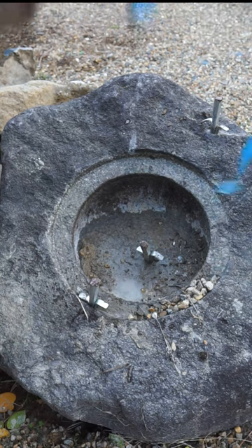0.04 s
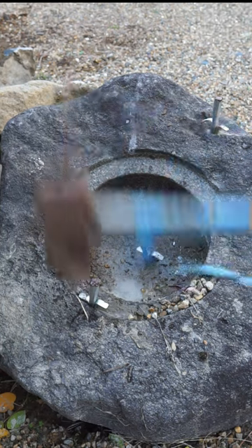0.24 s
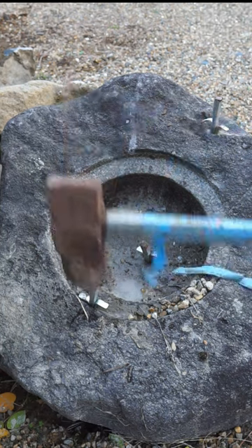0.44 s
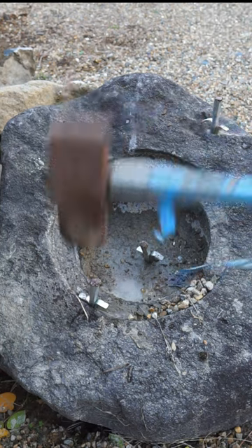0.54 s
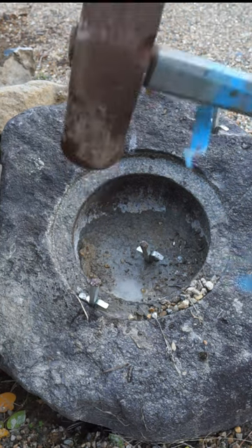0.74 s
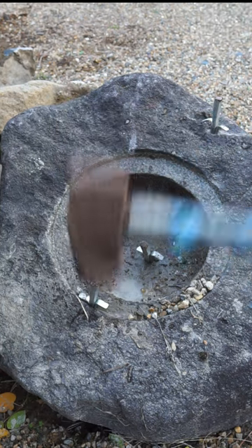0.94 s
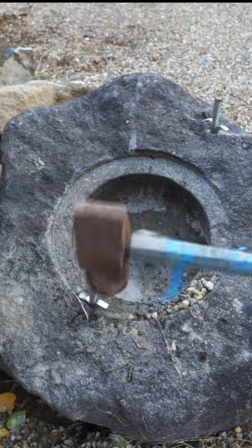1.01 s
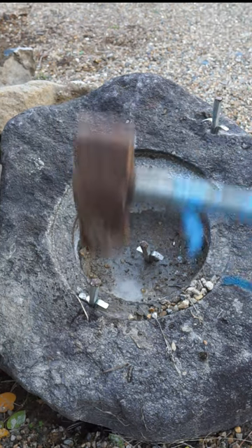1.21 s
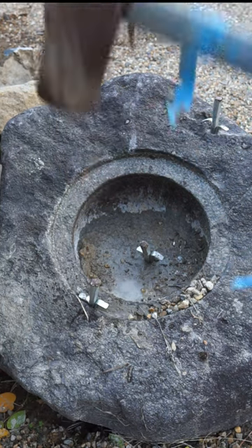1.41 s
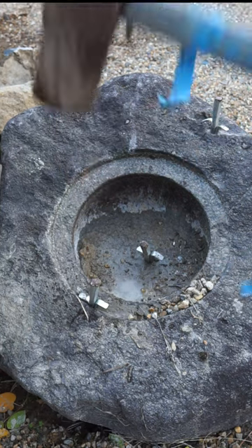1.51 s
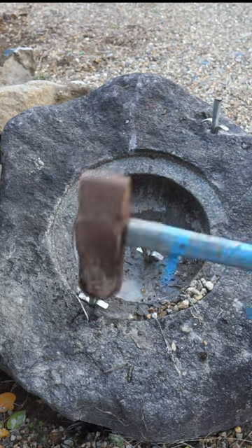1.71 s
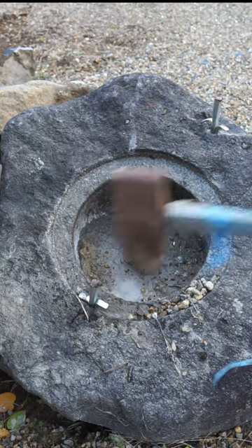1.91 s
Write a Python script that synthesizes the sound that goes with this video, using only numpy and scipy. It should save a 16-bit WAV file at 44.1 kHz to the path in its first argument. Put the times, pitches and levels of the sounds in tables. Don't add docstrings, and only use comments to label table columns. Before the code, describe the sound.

Heavy hammer blows on steel in rock, heard close up outside on gravel. Loose shims tinkle and stones rustle first, then three bright metallic cracks ring and fade, with faint grit and pebble knocks between them.

```python
import sys
import numpy as np
from scipy import signal
from scipy.fft import rfft, irfft, next_fast_len
from scipy.io import wavfile

SR = 44100
rng = np.random.default_rng(int(sys.argv[2]) if len(sys.argv) > 2 else 0)


def to_linear_factor(level_db):
    exponent = np.asarray(level_db, float) / 20
    return 10 ** exponent


def to_wav(sig):
    pcm = np.clip(np.atleast_2d(sig), -1, 1) * 32767
    pcm = np.round(pcm).astype(np.int16)
    wavfile.write(sys.argv[1], SR, pcm.T)


N = 85995
OPPOSED = np.array([[1], [-1]])


def rms_one(x):
    return x / np.sqrt(np.mean(x ** 2) + 1e-20)


def at_hz(points, hz):
    table_hz, value = np.transpose(points)
    return np.interp(np.log(hz), np.log(table_hz), value)


def drift(rate_hz):
    r = np.exp(-2 * np.pi * rate_hz / SR)
    settle = 20000
    wander = signal.lfilter([1], [1, -2 * r, r * r], rng.standard_normal(N + settle))
    return rms_one(wander[settle:])


def ring(push, hz, t60_s):
    r = to_linear_factor(-60 / (max(t60_s, .001) * SR))
    w = 2 * np.pi * hz / SR
    return signal.lfilter([0, np.sin(w)], [1, -2 * r * np.cos(w), r * r], push + 1e-18)


def add(out, start_s, x):
    i = int(start_s * SR)
    out[..., i:i + x.shape[-1]] += x[..., :N - i]


def filtered(x, order, hz, kind):
    return signal.sosfilt(signal.butter(order, hz, kind, fs=SR, output="sos"), x)


def wash(spectrum, gain):
    # frequency in Hz, likeness 0 to 1.
    likeness = [(60, 0.86), (300, 1), (1000, 0.5), (3000, 0.08), (10000, 0.14)]
    out = 0
    edges_hz = 28 * 2 ** np.arange(0, 9.6, .5)
    white = rng.standard_normal((2, 2, N))
    for k, (low_hz, high_hz) in enumerate(zip(edges_hz, edges_hz[1:])):
        mid, side = filtered(white[k % 2], 2, [low_hz, high_hz], "band")
        hz = np.sqrt(low_hz * high_hz)
        alike = np.clip(at_hz(likeness, hz), 0, 1)
        stereo = np.sqrt(1 + alike) * mid + np.sqrt(1 - alike) * side * OPPOSED
        out = out + to_linear_factor(at_hz(spectrum, hz)) * gain(hz) * stereo
    return out


def air():
    # frequency in Hz, level in dB.
    air_colour = [(18, -67), (30, -39.5), (200, -17.5), (519, -12.5), (1800, -4.5), (2600, 0), (3380, -3.5),
                  (13400, -5.5), (15200, -14), (16500, -22.5)]
    return to_linear_factor(-70) * rms_one(wash(air_colour, lambda hz: 1))


def rustle():
    # time in seconds, level in dB.
    rustle_course = [(0, -48), (0.038, -55.5), (.12, -51.5), (.2, -51.5), (.225, -55.5), (.45, -75.5),
                     (0.602, -89.5), (1.002, -67.5), (1.099, -64), (1.24, -60.5), (1.328, -68),
                     (1.499, -75), (1.558, -88), (1.7, -68.5), (1.8, -59), (1.95, -64)]
    # frequency in Hz, level in dB.
    rustle_colour = [(300, -30.5), (620, -14), (950, 0.5), (1600, -11.5), (2300, -3), (4500, -12.5),
                     (8000, -21), (15000, -25.5)]
    course = to_linear_factor(np.interp(np.arange(N) / SR, *np.transpose(rustle_course)))
    shared = drift(30)
    own = [drift(24) for _ in range(3)]
    patches = wash(rustle_colour, lambda hz: to_linear_factor(0.75 * shared + 2.0 * own[int(hz) % 3]))
    return course * to_linear_factor(3.0) * rms_one(patches)


def taps():
    # start in seconds, peak in dB, frequency in
    # Hz, t60 in seconds.
    knocks = [(.002, -37.5, 1160, 0.033), (0.1245, -36.5, 2420, 0.0028), (0.127, -38.5, 1380, 0.021),
              (0.2086, -30, 1295, 0.012), (0.2099, -37.5, 2080, 0.011), (0.2958, -31.5, 6500, 0.014),
              (0.3128, -32.5, 7160, 0.055), (.338, -31, 6700, 0.032), (.345, -49, 2690, .03),
              (.46, -50, 2700, 0.041), (0.516, -58, 2530, 0.048), (0.658, -54, 2700, 0.051),
              (.71, -53.5, 2730, 0.044), (0.7933, -52.5, 2690, 0.029), (0.9266, -51.5, 2710, 0.049),
              (1.4501, -46, 2417, 0.026), (1.621, -44.5, 2420, 0.03), (1.6262, -40, 2430, 0.045),
              (1.6295, -40.5, 2395, 0.012), (1.8261, -45.5, 2380, 0.032), (.964, -48.5, 2600, 0.015),
              (1.012, -47, 6000, 0.046), (1.721, -40, 7740, 0.029), (1.0113, -31, 7825, 0.089)]
    # start in seconds, peak in dB, frequency in Hz, t60 in seconds.
    undertones = [(0.7928, -63, 1286, 0.11), (0.929, -64, 1258, 0.2), (1.451, -62, 498, 0.072),
                  (1.627, -43.5, 1221, 0.069), (1.628, -50, 490, 0.048), (1.828, -42, 1070, 0.04)]
    out = np.zeros(N)
    t = np.arange(SR // 5) / SR
    for start_s, db, hz, t60_s in knocks + undertones:
        touch = np.exp(-t / 0.00021)
        scrape = rng.standard_normal(len(t)) * np.exp(-t / 0.0068)
        mode = ring(touch * np.cos(2 * np.pi * hz * t) + 0.18 * scrape, hz, t60_s)
        tick = signal.lfilter([.2, -.2], [1, -1.6, .68], scrape)
        add(out, start_s, to_linear_factor(db) * (mode / np.abs(mode).max() + 0.5 * tick))
    return out


def ticks():
    # start in seconds, peak in dB, centre in Hz, length in seconds.
    grit_ticks = [(.003, -32, 4300, 0.00072), (.009, -33, 5830, 0.0043), (.2085, -33, 8800, 0.00036),
                  (0.2406, -13, 6980, 0.00056), (0.242, -25, 6460, 0.0047), (.245, -29.5, 2200, 0.0024),
                  (0.248, -31, 9000, 0.0035), (0.2545, -31, 9500, 0.0014), (0.256, -32, 4500, .004),
                  (0.264, -13, 6200, 0.00035), (0.2656, -25, 6500, 0.0026), (.2966, -37, 9000, .004),
                  (0.316, -32.5, 10000, 0.0054), (0.543, -45.5, 6200, 0.0034), (0.569, -47, 4470, .003),
                  (0.5865, -47.5, 4800, 0.0093), (0.615, -40.5, 7800, 0.00074),
                  (0.6287, -44.5, 10160, 0.0056), (0.6415, -41.5, 9620, 0.005), (0.71, -49, 9000, 0.0036),
                  (0.7495, -43, 8900, 0.008), (.764, -45.5, 9100, 0.0036), (0.7952, -32, 9000, 0.00077),
                  (0.9258, -41, 9800, 0.004), (0.963, -39, 6000, 0.0015), (1.01, -53, 8000, .003),
                  (1.323, -47.5, 9750, 0.01), (1.3395, -42, 11200, 0.0039), (1.4506, -40.5, 7200, 0.0025),
                  (1.488, -56, 3970, .004), (1.5665, -39.5, 10800, 0.002), (1.6206, -38, 9500, 0.0028),
                  (1.6256, -38.5, 8000, 0.005), (1.677, -46, 5400, 0.0013), (1.684, -42, 7800, 0.0058),
                  (1.716, -34, 3500, 0.01), (1.794, -34, 5760, 0.0035), (1.827, -34.5, 5600, 0.0035),
                  (1.86, -47, 11500, .003), (1.875, -40, 9400, 0.004)]
    grains_per_s = 1500
    out = np.zeros((2, N))
    t = np.arange(SR // 16) / SR
    for start_s, db, hz, length_s in grit_ticks:
        hits = rng.random(len(t)) < grains_per_s / SR
        grains = rng.standard_normal((2, len(t))) * (.2 + .5 * hits)
        grains[:, 3] = 2
        fade = np.exp(-(t / max(2.06 * length_s, .0003)) ** 2)
        burst = filtered(grains * fade, 2, [hz / 2.02, min(hz * 1.7, 17000)], "band")
        add(out, start_s, to_linear_factor(db) * burst / np.abs(burst[0]).max())
    return out


def skids():
    # start in seconds, level in dB, centre in Hz, width in Hz, length in seconds.
    chip_skids = [(.006, -48, 1160, 350, 0.024), (0.019, -48.5, 960, 200, .011),
                  (0.041, -50.5, 1025, 300, 0.031), (0.2386, -35.5, 4240, 500, 0.0043),
                  (0.25, -39, 4500, 500, 0.0045), (0.251, -35, 8000, 600, 0.004),
                  (0.7473, -51.5, 11100, 1200, 0.0062), (0.762, -58, 11200, 1500, 0.0094),
                  (0.787, -54, 10800, 1500, 0.0066), (0.798, -53, 11300, 1800, .008),
                  (0.8078, -51.5, 11200, 1510, 0.0086), (1.654, -63, 11000, 1500, .006)]
    out = np.zeros((2, N))
    t = np.arange(SR // 16) / SR
    for start_s, db, hz, width_hz, length_s in chip_skids:
        band_hz = [hz - width_hz / 2, hz + width_hz / 2]
        squeak = rms_one(filtered(rng.standard_normal((2, len(t))), 1, band_hz, "band"))
        add(out, start_s, to_linear_factor(db) * squeak * np.minimum(t / .001, 1) * np.exp(-(t / length_s) ** 3))
    return out


def clang(peaks, contact_s, crack_db):
    t = np.arange(SR // 8) / SR
    contact = t / contact_s * np.exp(1 - t / contact_s)
    push = rng.standard_normal(len(t))
    crack = filtered(push, 2, 1700, "high")
    out = to_linear_factor(crack_db) * crack * (contact + 0.48 * np.exp(-t / 0.0046)) / 2
    for hz, t60_s, db in peaks:
        mode = ring(contact * (np.cos(2 * np.pi * hz * t) + 0.4 * push), hz, t60_s)
        out = out + to_linear_factor(db) * mode / np.abs(mode).max()
    return out


def thud(start_hz, end_hz, t60_s, db):
    rise_s, glide_s = 0.0016, 0.0064
    t = np.arange(SR // 8) / SR
    hz = end_hz + (start_hz - end_hz) * np.exp(-t / glide_s)
    swing = 2 * np.sin(2 * np.pi * np.cumsum(hz) / SR)
    return to_linear_factor(db - 60 * t / t60_s) * (1 - np.exp(-t / rise_s)) * swing


def hum(hz, width_hz):
    phase = 2 * np.pi * hz * np.arange(N) / SR
    steady = 6 * np.clip(1 - width_hz / 30, 0, 1)
    in_phase = (steady + drift(width_hz / 2)) * np.sin(phase)
    quadrature = drift(width_hz / 2) * np.cos(phase) * (1 - steady / 8)
    return rms_one(in_phase + quadrature)


def long_rings(rings):
    decay_bend = 1.743
    scatter = 0.33
    t = np.arange(N) / SR
    centre, side = np.zeros(N), np.zeros(N)
    for hz, db, t60_s, swell_s, width_hz in rings:
        swell = 1 - np.exp(-(t / swell_s) ** 2)
        shape = to_linear_factor(db - 60 * (t / t60_s) ** decay_bend) * swell
        centre += shape * hum(hz, width_hz)
        side += scatter * min(width_hz / 300, 1) * shape * hum(hz, 2 * width_hz)
    return centre, side


def yard_echo(db, tilt_db):
    # frequency in Hz, level in dB.
    yard_colour = [(60, -3.5), (150, -7), (400, 10), (700, -2.5), (1500, -13), (5000, -17.5), (9000, -30.5),
                   (15000, -18.5)]
    # frequency in Hz, t60 in seconds.
    yard_decay = [(100, 0.74), (400, 0.84), (1000, 1), (2500, 0.92), (6000, 0.99), (15000, 0.17)]
    delay_s, swell_s = 0.012, 0.014
    t = np.arange(N) / SR
    rise = 1 - np.exp(-(np.maximum(t - delay_s, 0) / swell_s) ** 2)

    def gain(hz):
        treble_db = tilt_db * max(np.log2(hz / 1000), 0)
        return rise * to_linear_factor(treble_db - 60 * t / at_hz(yard_decay, hz))

    return to_linear_factor(db + 10) * wash(yard_colour, gain)


def blows():
    # start in seconds, peak in dB, contact length in seconds, crack in dB.
    hammer_blows = [
        (0.2663, -7.5, 0.00064, -9),
        (0.979, -15.5, 0.00027, -3),
        (1.6905, -16.5, 0.00022, -1),
    ]
    side_lean = [0.0, -0.18, -0.12]
    # start in Hz, end in Hz, t60 in seconds, level in dB.
    rock_thuds = [(300, 500, 0.056, -22.5), (329, 460, 0.029, -11.5), (314, 524, 0.014, -0.5)]
    # frequency in Hz, t60 in seconds, level in dB.
    clang_1 = [(860, 0.014, -20.5), (1190, 0.018, -29.5), (2030, 0.022, -31), (2683, 0.024, -20.5),
               (4680, 0.013, -21), (5920, 0.0085, -4.5), (6410, 0.0045, -3.5), (7020, 0.024, -10),
               (12700, 0.0087, -27.5)]
    clang_2 = [(833, 0.0052, -14), (2220, 0.0079, -14.5), (6260, 0.0064, -11), (6940, 0.032, -12.5),
               (7840, 0.025, -1.5), (12200, 0.015, -21)]
    clang_3 = [(1007, 0.014, -9.5), (2380, 0.028, -16.5), (3140, 0.035, -21.5), (5980, 0.013, -8.5),
               (7220, 0.014, -7.5), (7820, 0.011, 0.5), (8980, 0.012, -10), (13100, 0.017, -11)]
    # frequency in Hz, level in dB, t60 in seconds, swell in seconds, width in Hz.
    ring_1 = [(643.5, -47, 0.69, 0.026, 2), (895, -59.5, 0.44, 0.014, 150), (7140, -42, 0.41, 0.021, 450),
              (6400, -45, 0.43, 0.028, 900), (2690, -57.5, 0.64, 0.053, 230),
              (5690, -48.5, 0.28, 0.027, 700), (7570, -63, .4, 0.022, 360), (401, -48.5, 0.39, .02, 150)]
    ring_2 = [(680, -52, 0.65, 0.14, 6.7), (988, -54, 0.48, 0.013, 16), (2203, -60.5, 0.96, .15, 120),
              (7825, -45.5, 0.42, 0.032, 170), (7130, -46, 0.38, 0.025, 510),
              (414, -53.5, 0.57, 0.0293, 52), (879, -58.5, 1.11, 0.0294, 210),
              (7850, -56.5, 0.55, 0.024, 400), (6200, -65.5, 0.28, .02, 590)]
    ring_3 = [(680, -51.5, 0.6, 0.022, 72), (1019, -52, 0.44, 0.013, 104), (2436, -59, 0.53, 0.011, 310),
              (7980, -49, 0.4, 0.027, 1200), (325.4, -49.5, 0.45, 0.067, 70),
              (12800, -65, 0.22, 0.034, 510), (8800, -55, 0.25, 0.03, 650)]
    # level in dB, treble tilt in dB per octave.
    yard_answers = [(-53, 6), (-52, 2.5), (-48.5, 4.5)]
    clangs, rings = (clang_1, clang_2, clang_3), (ring_1, ring_2, ring_3)
    clang_side_db = -19
    near, leaning, far = np.zeros(N), np.zeros(N), np.zeros((2, N))
    for k, (start_s, db, contact_s, crack_db) in enumerate(hammer_blows):
        direct = to_linear_factor(db) * clang(clangs[k], contact_s, crack_db)
        add(near, start_s, direct + to_linear_factor(db) * thud(*rock_thuds[k]))
        add(leaning, start_s, side_lean[k] * direct)
        side_clang = clang(clangs[k][2:], contact_s, crack_db)
        add(far, start_s, to_linear_factor(db + clang_side_db) * side_clang * OPPOSED)
        ring_centre, ring_side = long_rings(rings[k])
        add(near, start_s, ring_centre)
        add(far, start_s, ring_side * OPPOSED)
        add(far, start_s, yard_echo(*yard_answers[k]))
    return near, far + ports(leaning) * OPPOSED


def ports(x):
    # frequency in Hz, left lead in radians.
    port_phase = [(400, 0.25), (1000, -0.81), (2500, -1.1), (6000, -1.44), (15000, -1.2)]
    # frequency in Hz, left minus right in dB.
    port_gap = [(300, 1.5), (1000, -2), (3000, -3.5), (8000, -2), (15000, -2)]
    size = next_fast_len(N + 2048)
    hz = np.maximum(np.arange(size // 2 + 1) * SR / size, 10)
    half = to_linear_factor(at_hz(port_gap, hz) / 2) * np.exp(.5j * at_hz(port_phase, hz))
    spectrum = rfft(x, size)
    return np.array([irfft(spectrum * h, size)[:N] for h in (half, 1 / half)])


def scene():
    grit_side_db, grit_pan_db, near_cut_hz = -12, -3.5, 274
    near, far = blows()
    centre, side = ticks() + skids()
    chips = ports(centre) + to_linear_factor(grit_side_db) * side * OPPOSED
    chips = chips * to_linear_factor(OPPOSED * grit_pan_db / 2)
    close = filtered(ports(near + taps()) + chips, 3, near_cut_hz, "high")
    return close + far + rustle() + air()


def top_cut(x):
    return signal.sosfilt(signal.butter(12, 16700, fs=SR, output="sos"), x)


def record(dry):
    topped = signal.sosfilt(signal.cheby2(10, 50, 16750, fs=SR, output="sos"), dry)
    mix = filtered(topped, 1, 120, "high")
    return top_cut(mix)


dry = scene()
out = record(dry)
to_wav(out)
```